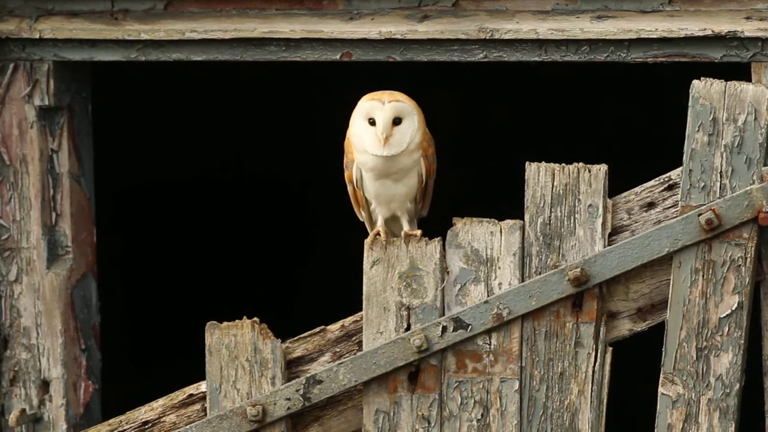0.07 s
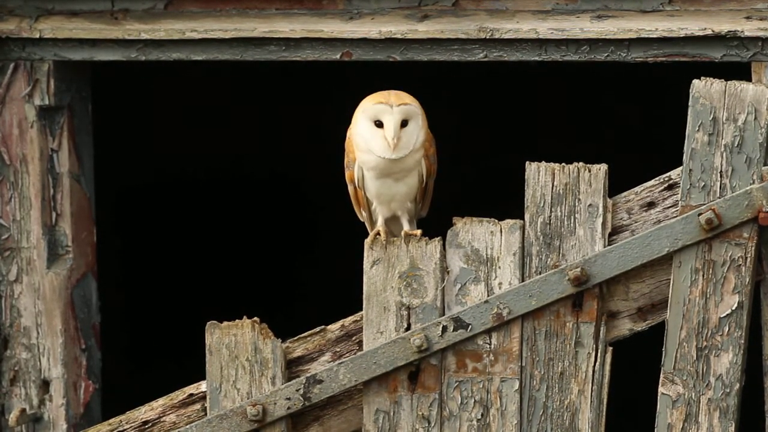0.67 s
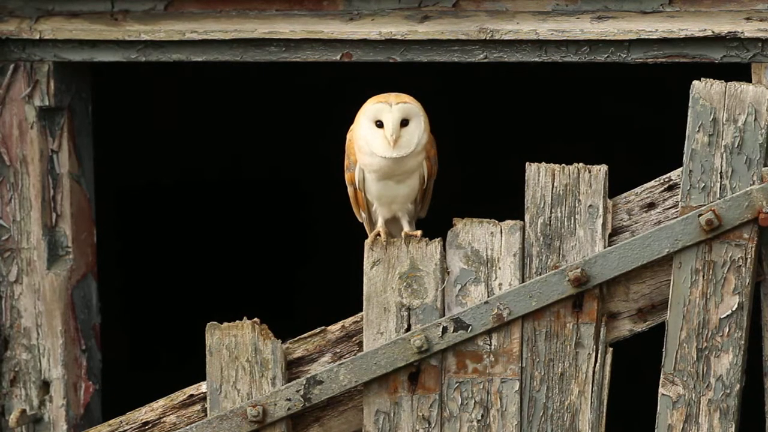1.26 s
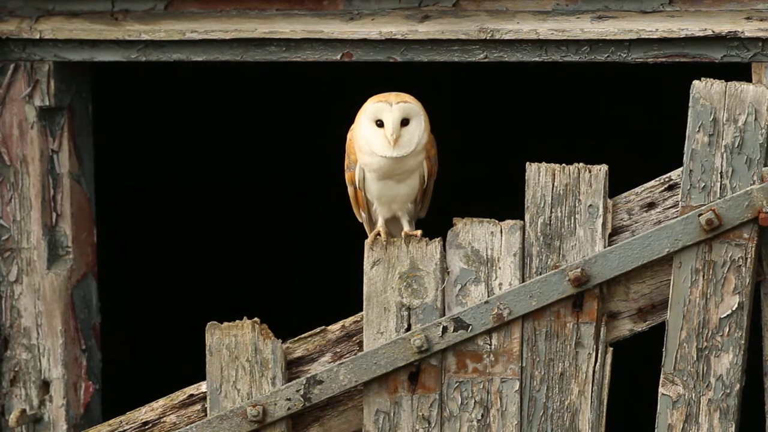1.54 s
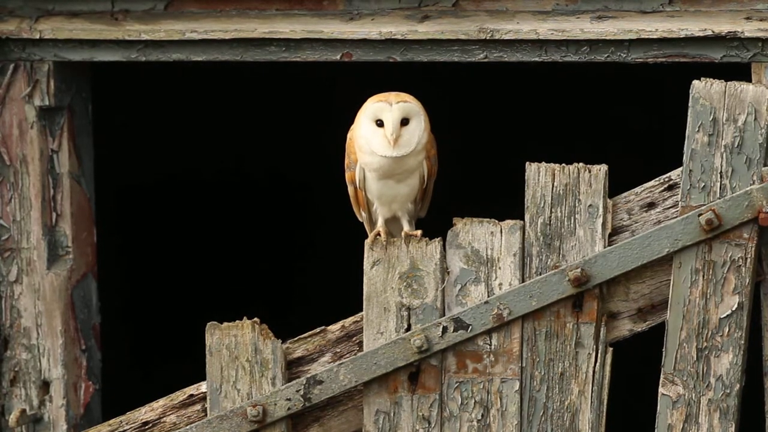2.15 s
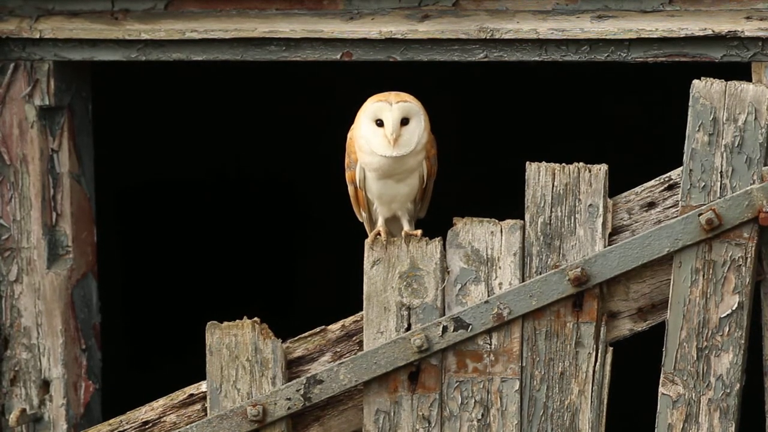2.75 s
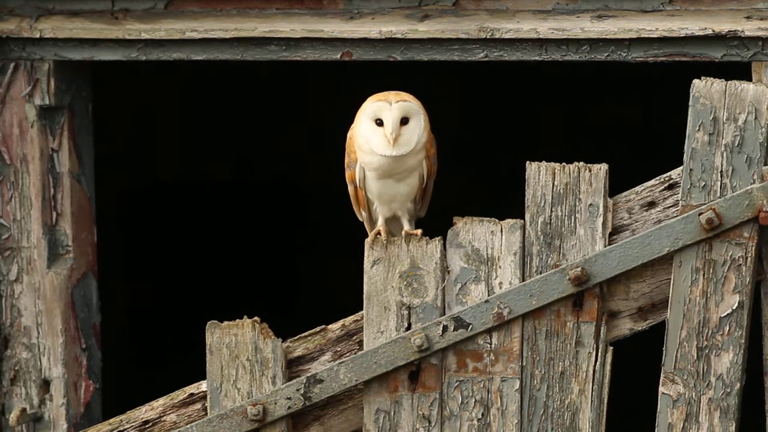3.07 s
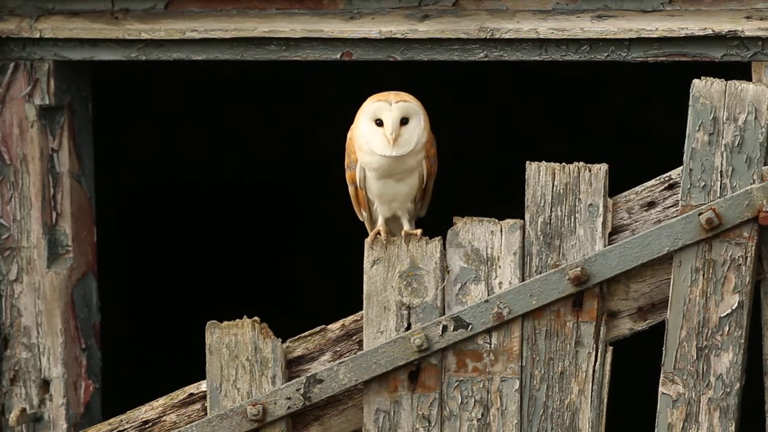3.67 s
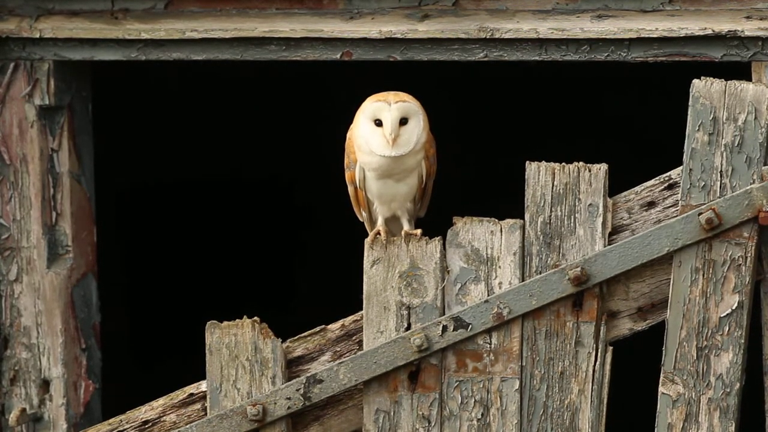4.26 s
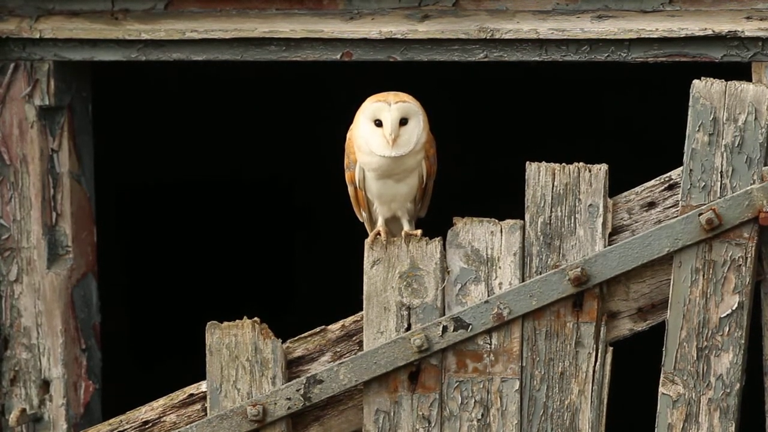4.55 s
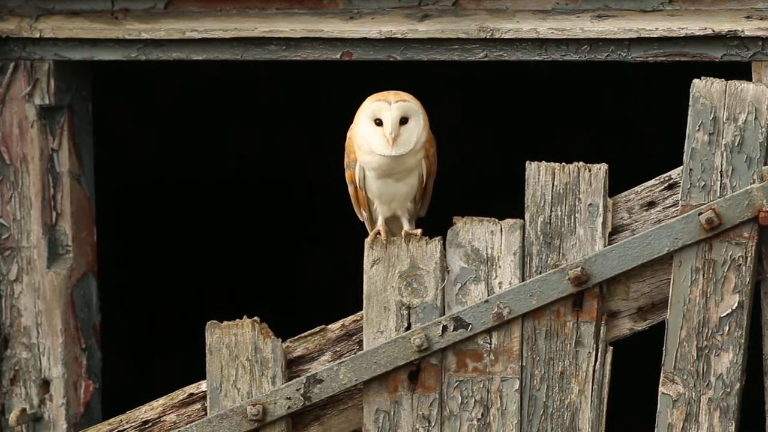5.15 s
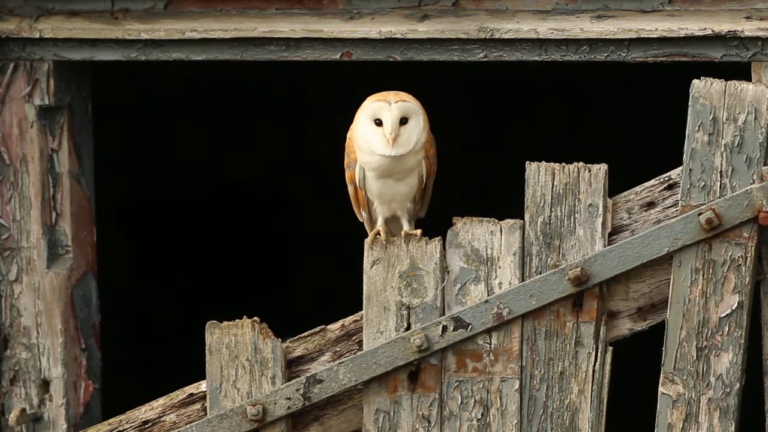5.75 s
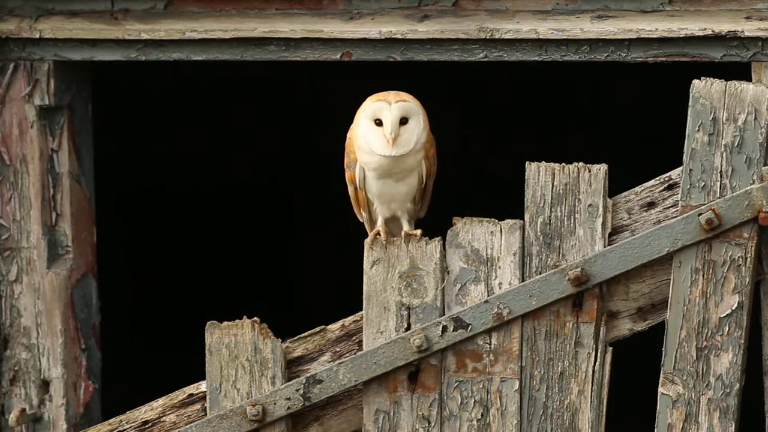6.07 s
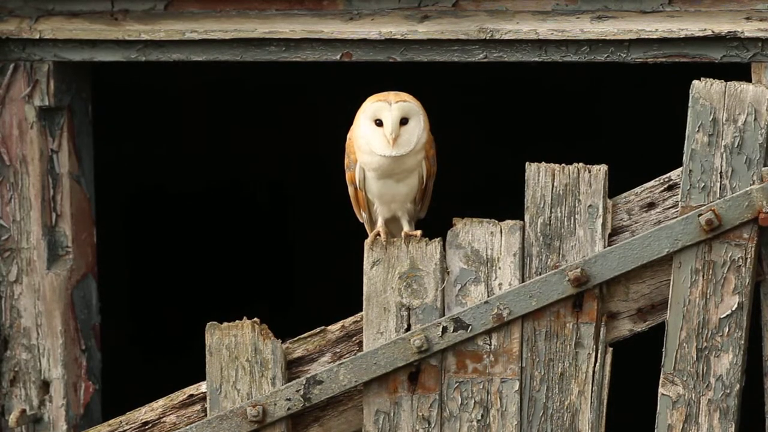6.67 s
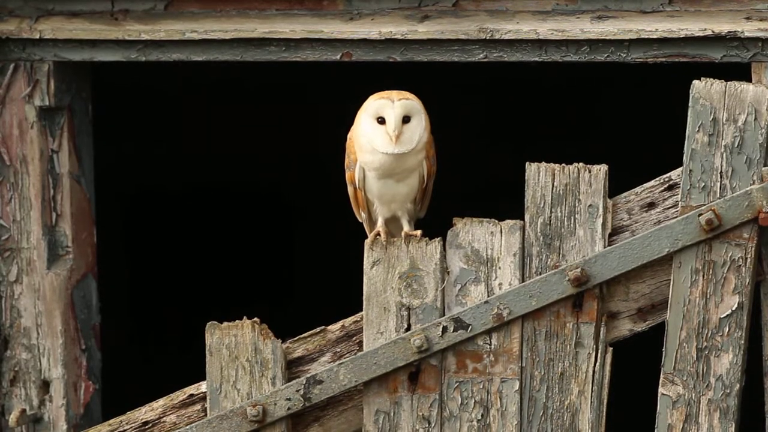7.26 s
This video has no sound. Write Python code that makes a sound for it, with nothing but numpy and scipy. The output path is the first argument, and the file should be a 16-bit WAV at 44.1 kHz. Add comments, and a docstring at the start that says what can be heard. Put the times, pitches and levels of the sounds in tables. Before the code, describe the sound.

Two raspy owl screeches over a soft rural background, the first short and fluttering, the second swelling and breaking into squeals.

```python
"""Quiet country air with faint ticks and a thin high whine; then a barn owl on an old gate screeches twice:
a short harsh call, and a long hiss that swells and breaks into squeals. Its syrinx is a rough whistle
that flutters about 50-60 times a second, mixed with rushing air and shaped by the throat.
The barn rings briefly. A thin hiss and soft bumps sit behind; slow gain control ducks the peak."""
import sys
import numpy as np
from scipy import signal
from scipy.fft import rfft, irfft
from scipy.io import wavfile
from scipy.ndimage import uniform_filter1d, minimum_filter1d

SR = 44100
rng = np.random.default_rng(int(sys.argv[2]) if len(sys.argv) > 2 else 0)


def to_wav(s):
    """Save 16-bit WAV."""
    ch = np.atleast_2d(s).T  # columns
    pcm = np.round(np.clip(ch, -1, 1) * 32767)  # PCM
    wavfile.write(sys.argv[1], SR, pcm.astype(np.int16))


N = 326781
TIME = np.arange(N) / SR
FREQ = np.fft.rfftfreq(N, 1 / SR)

# tone colour of the air bed and of the thin hiss: freq_hz, relative_db
AIR_SPECTRUM = [(25, -15), (60, -8), (150, -9), (400, 0.5), (700, -1.5), (1050, -2), (1500, -3.5),
                (1950, -10), (2450, -9.5), (3000, -16), (6000, -22.5), (10000, -21.5), (13000, -28),
                (15500, -23.5)]
HISS_SPECTRUM = [(760, -28.5), (1300, -2.5), (1840, -14), (2340, -6), (3030, -12.5), (3340, 0), (3550, -5),
                 (4000, -25.5), (4780, -25.5), (5180, -25.5), (5950, -37.5), (8770, -29.5), (9590, -32),
                 (11800, -28.5), (14000, -71)]
# narrow bands throbbing far away: centre_hz, width_hz, level_db, throb_db
DISTANT_BANDS = [(164.6, 62, -67, -2.5), (315.5, 45, -65.5, 7), (500, 37, -63, 10), (824, 54, -60.5, 1.5),
                 (1277, 142, -52, 7.5), (2400, 190, -65, 5)]
# soft background bumps: middle_s, length_s, centre_hz, level_db
SOFT_BUMPS = [(2.548, 0.072, 1540, -45), (3.51, 0.051, 170, -53), (4.87, 0.17, 557, -51),
              (5.47, 0.033, 268.2, -51), (5.905, 0.09, 126.6, -57.5), (6.26, 0.11, 80, -48),
              (6.54, 0.05, 146.5, -49), (7.239, 0.083, 131, -50), (7.327, 0.097, 121, -52.5)]
# two close tones that beat: pitch_hz, level_db
WHINE_TONES = [(15735.5, -69), (15745.3, -74.5)]
# resonances of throat and beak: centre_hz, width_hz, gain_db
THROAT_RESONANCES = [(1507, 354, -0.5), (1960, 327, -1.5), (2337, 422, -3.5), (2984, 250, -7),
                     (3492, 305, 0.5), (3672, 32, 0), (4335, 250, -27), (5356, 690, -25.5),
                     (6580, 1240, -31), (7220, 580, -24), (8800, 910, -34.5), (10700, 1300, -32)]
# air rushing through the syrinx, and its sizzle when blown hard: freq_hz, relative_db
RUSH_SPECTRUM = [(1200, -1.5), (2400, 13), (3600, -1), (4200, 1.5), (7200, -6.5), (11000, -35)]
SIZZLE_SPECTRUM = [(2500, -44), (4200, -8), (5800, -1), (7300, 2), (9000, -3.5), (11500, -2.5),
                   (13000, -10.5)]
# the short call swells twice: time_s, effort_db, rasp_db
SHORT_CALL_CURVE = [(.8, -15.5, -20), (.93, -10, -29), (1.07, -11.5, -30), (1.15, -12, -8.5),
                    (1.21, -14, -15), (1.36, -16.5, -5.5), (1.61, -11.5, -17.5), (1.9, -12, -13),
                    (2.02, -14.5, -16)]
# the long call swells and rises: time_s, effort_db, pitch_hz, air_share
LONG_CALL_CURVE = [(3.96, -42.5, 1550, 0.75), (4.1, -35, 1563, .42), (4.55, -33, 1587, 0.68),
                   (4.87, -27, 1600, 0.8), (4.995, -32, 1590, .76), (5.012, -25, 1578, 0.94),
                   (5.2, -25, 1585, 0.62), (5.32, -20.5, 1605, 0.07), (5.47, -22, 1629, 0.27),
                   (5.84, -16, 1931, 0.4), (6.2, -14.5, 2070, 0.8), (6.3, -13, 2101, 0.79),
                   (6.42, -11, 1914, 0.49), (6.57, -7, 2000, 0.07), (6.79, -12.5, 2020, 0.7)]
# the syrinx jumps up to a clean, arching tone: middle_s, length_s, top_pitch_hz, boost_db
SQUEAL_NOTES = [(6.004, .0042, 2320, 5), (6.264, .006, 2250, 6.5), (6.296, .005, 2350, 10),
                (6.322, 0.01614, 2450, 10.5), (6.36, .007, 2460, 9.5), (6.426, .007, 2420, 9),
                (6.459, .006, 2470, 9), (6.491, .022, 2390, 4), (6.523, 0.021, 2420, 7),
                (6.555, .021, 2450, 5.5), (6.594, .019, 2460, 8), (6.624, .021, 2450, 8),
                (6.663, .014, 2480, 12), (6.699, .008, 2450, 10.5), (6.736, .005, 2400, 7),
                (6.777, .0074, 2420, 12.5)]
# it locks on its lower tone, with a piercing octave: middle_s, length_s, boost_db
YELP_NOTES = [(6.35, .012, -4.5), (6.382, .018, -2), (6.417, .015, -2), (6.451, 0.01492, -4.5),
              (6.65, 0.0129, 0), (6.689, .014, -2)]

SHORT_START_S, SHORT_END_S, LONG_START_S, LONG_END_S = .796, 2.05, 3.96, 6.815
VOICED_S, BREAK_S = 5.2, 5.86  # the long call finds its voice, then breaks into a ragged scream


def amp(db):
    """Decibels to gain."""
    return 10 ** (np.asarray(db) / 20)


def unit(x):
    """Scales to rms 1."""
    return x / np.sqrt(np.mean(x ** 2) + 1e-20)


def blend(a, b, share):
    """Crossfades from a to b as share goes from 0 to 1."""
    return a + (b - a) * share


def ramp(start_s, length_s):
    """Rises from 0 to 1 and holds."""
    return np.clip((TIME - start_s) / length_s, 0, 1)


def follow(curve):
    """One automation lane per column, in straight lines over time."""
    times, *columns = np.transpose(curve)
    return [np.interp(TIME, times, column) for column in columns]


def over_frequency(points, hz):
    """Joins points by straight lines over log frequency."""
    point_hz, values = np.transpose(points)
    return np.interp(np.log(hz + 1), np.log(point_hz + 1), values)


def peak(hz, width):
    """Gain of a resonance with steep skirts."""
    return 1 / (1 + ((FREQ - hz) / width) ** 2) ** 2


def noise(gain):
    """Noise of rms 1, coloured by a gain at each frequency."""
    return unit(irfft(rfft(rng.standard_normal(N)) * gain, N))


def shaped_noise(spectrum):
    """Noise of rms 1, coloured by an EQ curve."""
    return noise(amp(over_frequency(spectrum, FREQ)))


def wander(hz):
    """Random drift that rolls off above hz."""
    return noise(np.exp(-(FREQ / hz) ** 2))


def country_air(level_db=-52.5):
    """A soft, wide bed with a few narrow, throbbing bands from far away."""
    bands = sum(amp(db + throb_db * np.tanh(wander(24))) * noise(peak(hz, width))
                for hz, width, db, throb_db in DISTANT_BANDS)
    return amp(level_db + wander(14)) * shaped_noise(AIR_SPECTRUM) + bands


def hiss(start_s=.8, level_db=-46):
    """A thin hiss that sets in with the first call and sinks under the second."""
    fader_db = np.interp(TIME, [2.2, 3, 3.9, 4.3, 6, 7.3], [3.5, 2, 1.5, -4.5, -1, -5.5])
    return amp(level_db + fader_db + .5 * wander(16)) * (TIME > start_s) * shaped_noise(HISS_SPECTRUM)


def ticks(per_s=60, level_db=-67.5, ring_s=.0017, spread_db=4):
    """Faint, irregular high ticks, like an insect in the grass."""
    clicks = (rng.random(N) < per_s / SR) * amp(spread_db * rng.uniform(-1, 1, N))
    age = TIME[:2 ** 10] / ring_s
    bursts = np.sqrt(abs(signal.oaconvolve(clicks ** 2, age * np.exp(-2 * age))[:N]))
    return amp(level_db) * unit(bursts * noise(peak(hz=8550, width=750) + .059))


def bumps():
    """Short, soft swells of narrow noise."""
    return sum(amp(db) * np.exp(-(2 * (TIME - middle_s) / length_s) ** 2) * noise(peak(hz, width=96))
               for middle_s, length_s, hz, db in SOFT_BUMPS)


def whine():
    """A very high electrical whine that beats."""
    return sum(amp(db) * np.sqrt(2) * np.sin(2 * np.pi * (hz * TIME + rng.random()))
               for hz, db in WHINE_TONES)


def barn(calls, early_db=-12, tail_db=-16, early_decay_s=.017):
    """Quick reflections from the boards, then a tail that dies sooner in the treble."""
    t = TIME[:SR]
    taps = rng.choice([-1., 1.], SR) * (rng.random(SR) < 3000 / SR) * (t > .003)
    early = taps * np.exp(-t / early_decay_s)
    hz, frame_s, wash = signal.stft(rng.standard_normal(SR) * (t > .015), SR, nperseg=256)
    reverb_s = over_frequency([(1000, 1), (1900, 1), (2500, .72), (3500, .62), (5500, .45),
                               (7200, .53), (9000, .44), (12000, .37)], hz)[:, None]
    tail = signal.istft(wash * amp(-60 * frame_s / reverb_s), SR, nperseg=256)[1][:SR]
    response = amp(early_db) * early / np.linalg.norm(early) + amp(tail_db) * tail / np.linalg.norm(tail)
    return calls + signal.fftconvolve(calls, response)[:N]


def throat(source, low_cut_hz=1230):
    """Throat and open beak: a row of resonances that pass no low end."""
    gain = np.sqrt(sum((amp(db) * peak(hz, width)) ** 2 for hz, width, db in THROAT_RESONANCES))
    gain /= np.sqrt(1 + (low_cut_hz / (FREQ + 1)) ** 20)
    # minimum phase: the throat rings only after it is excited
    cepstrum = irfft(np.log(np.maximum(gain, 1e-5)), N)[:N // 2]
    cepstrum[1:] *= 2
    response = irfft(np.exp(rfft(cepstrum, N)), N)[:2 ** 11]
    return signal.oaconvolve(source, response)[:N]


def rush(pitch_hz, rush_db, ring_db):
    """Rushing air, which also rings loosely at the resting pitch of the membranes."""
    phase = 2 * np.pi * np.cumsum(pitch_hz * np.ones(N)) / SR
    ring = ((wander(180) + 1j * wander(160)) * np.exp(1j * phase)).real
    return amp(rush_db) * shaped_noise(RUSH_SPECTRUM) + amp(ring_db) * ring


def sizzle(level_db):
    """Air sizzling at the beak."""
    return amp(level_db) * shaped_noise(SIZZLE_SPECTRUM)


def rasp(push):
    """Top end of the short call: a steady band of air, and a higher one that puffs on every push."""
    puffs = noise(peak(hz=6950, width=450)) + sizzle(level_db=-7)
    return amp(-3) * noise(peak(hz=5350, width=330)) + blend(.15, 1, push) * puffs


def pulse(cycle, width):
    """One smooth hump (0-1) around every whole cycle."""
    return np.exp(-((cycle - np.round(cycle)) / width) ** 2)


def flutter(rate_hz, push_lead, push_width, flick_lead, flick_width):
    """Each flutter of the syrinx pushes air and flicks the pitch up; leads and widths are in cycles."""
    cycle = np.cumsum(rate_hz) / SR + .0251 * wander(38.44)
    push = pulse(cycle + push_lead, push_width)
    flick = pulse(cycle + flick_lead, flick_width) * (1 + .1 * wander(12.04))
    return push, flick


def scatter(push, steadying, speed_hz):
    """Between pushes the pitch scatters into noise."""
    return np.maximum(1 - steadying * push, .12) * (wander(speed_hz) + .6)


def whistle(hz, strain, octave_db, third_db, fourth_db):
    """The tone of the membranes; strain brings out the overtones."""
    phase = 2 * np.pi * np.cumsum(hz) / SR
    overtones = (amp(octave_db) * np.sin(2 * phase)
                 + amp(third_db + 5.9 * np.tanh(wander(16))) * np.sin(3 * phase)
                 + amp(fourth_db) * np.sin(4 * phase))
    return np.sqrt(2) * (np.sin(phase) + strain * overtones)


def call_gate(start_s, end_s, release_s=.026, release_db=-16):
    """A call has a hard attack and a quick release."""
    gate = ramp(start_s, .002) * (1 - ramp(end_s, .002))
    return gate * amp(release_db * ramp(end_s - release_s, release_s))


def locked_tones(edge_s=.00306, arch_hz=169.7, catch_db=-11.5, yelp_hz=1828, yelp_rise_hz_per_s=3800):
    """Squeals and yelps: how firmly the syrinx locks (0-1), and the pitch and colour it locks to."""
    notes = []  # middle_s, length_s, pitch_hz, boost_db, octave_db, third_db
    for middle_s, length_s, top_hz, db in SQUEAL_NOTES:
        offset_s = TIME - middle_s
        arch = np.minimum(abs(2 * offset_s / length_s), 1.3) ** 4
        # each squeal catches just before it falls away
        catch = np.exp(-((offset_s - length_s / 2 + .0067) / .0028) ** 2)
        notes.append((middle_s, length_s, top_hz - arch_hz * arch, db + catch_db * catch, -6, 1.5))
    for middle_s, length_s, db in YELP_NOTES:
        notes.append((middle_s, length_s, yelp_hz + yelp_rise_hz_per_s * (TIME - middle_s), db, 1, -2))
    lock, controls = np.zeros(N), np.zeros((4, N))
    for middle_s, length_s, *values in notes:
        held = np.clip((length_s / 2 - abs(TIME - middle_s)) / edge_s + .5, 0, 1)
        lock += held
        for control, value in zip(controls, values):
            control += held * value
    return np.minimum(lock, 1), controls / (lock + 1e-9)


def short_screech(pitch_hz=1591, scatter_hz=249, air_share=.063, slack_s=.081,
                  flutter_hz=58.96, sag_hz_per_s=7.87, octave_db_per_s=12):
    """A harsh rattle on one pitch: the flutter slows and the octave grows as the call goes on."""
    effort_db, rasp_db = follow(SHORT_CALL_CURVE)
    age = TIME - SHORT_START_S
    rate_hz = (flutter_hz - sag_hz_per_s * age) * (age >= 0)
    push, flick = flutter(rate_hz, push_lead=.14, push_width=.21, flick_lead=.08, flick_width=.13)
    # the flicks are smaller while the call gets going and as it goes slack
    slack = ramp(SHORT_END_S - slack_s, slack_s)
    swing_hz = blend(406.615, 709.728, ramp(SHORT_START_S, .1178) * (1 - slack))
    hz = pitch_hz + swing_hz * flick + scatter_hz * scatter(push, steadying=1, speed_hz=457)
    octave_db = -10.5 + octave_db_per_s * np.clip(age, 0, SHORT_END_S - SHORT_START_S) - 9 * slack
    strain = blend(.28, .91, push)
    tone = whistle(hz, strain, octave_db, third_db=blend(-30, -8, push), fourth_db=-26)
    voice = blend(.5, .99, push) * np.sqrt(1 - air_share) * tone + amp(rasp_db) * rasp(push)
    breath = np.sqrt(air_share) * blend(.73, 1, push) * rush(pitch_hz, rush_db=2.5, ring_db=-1)
    return (voice + breath) * amp(effort_db + .68 * wander(70)) * call_gate(SHORT_START_S, SHORT_END_S)


def long_screech(hiss_flutter_hz=54, voiced_flutter_hz=62.8, loosen_s=.14, swing_hz=110,
                 octave_db_per_hz=-.0466, sizzle_db_per_s=14):
    """A hiss that finds its voice, rises and breaks: the tone jumps between squeals and yelps."""
    effort_db, pitch_hz, air_share = follow(LONG_CALL_CURVE)
    loosened, broken = ramp(BREAK_S - loosen_s, loosen_s), ramp(BREAK_S, .0903)
    lock, (locked_hz, boost_db, locked_octave_db, locked_third_db) = locked_tones()
    rate_hz = np.where(TIME < VOICED_S, hiss_flutter_hz, voiced_flutter_hz) * (TIME >= LONG_START_S)
    push, flick = flutter(rate_hz, push_lead=.16, push_width=.25, flick_lead=.19, flick_width=.15)
    push = blend(push, blend(.5, push, .394), loosened)  # the flutter loses its grip before the break
    scatter_hz = blend(140, 270, broken) * scatter(push, steadying=.92, speed_hz=421.6)
    free_hz = pitch_hz + broken * swing_hz * flick + scatter_hz
    hz = blend(free_hz, locked_hz + 35 * wander(237), lock)
    # the tone gets purer as it rises, and harsh again once it breaks
    free_octave_db = blend(octave_db_per_hz * (pitch_hz - pitch_hz[0]), 1, broken)
    octave_db = blend(free_octave_db, locked_octave_db, lock)
    third_db = blend(blend(-13, -2, broken), locked_third_db, lock)
    strain = blend(blend(.92, .89, push), .78, lock)
    tone = whistle(hz, strain, octave_db, third_db, fourth_db=-13)
    # the sizzle jumps up at the break and keeps growing; locked notes shed air and sizzle
    sizzle_db = blend(-19, -4 + sizzle_db_per_s * (TIME - BREAK_S), loosened)
    sizzle_db += -10 * lock + 3 * wander(50)
    air_share *= 1 - .96 * lock
    tremolo = blend(blend(.29, .97, push), .88, lock)
    voice = tremolo * (np.sqrt(1 - air_share) * tone + sizzle(sizzle_db))
    breath = np.sqrt(air_share) * blend(.61, .74, push) * rush(pitch_hz, rush_db=4, ring_db=-5)
    flicker_db = blend(1.1, 1.84, broken) * (1 - .5 * lock) * wander(79)
    level_db = effort_db + lock * boost_db + flicker_db
    return (voice + breath) * amp(level_db) * call_gate(LONG_START_S, LONG_END_S)


def scene():
    """The owl, ringing in the barn, over the quiet background; mono."""
    owl = barn(throat(short_screech() + long_screech()))
    return (owl + country_air() + hiss() + ticks() + bumps() + whine())[None]


def record(dry, threshold_db=-16.5, memory_s=.44, ceiling=.78, high_cut_hz=16000):
    """Slow gain control rides the recent power, a soft limiter rounds the peaks, then a high cut."""
    recent = np.clip((memory_s - TIME[:SR]) / .02, 0, 1)
    power = abs(signal.fftconvolve((dry ** 2).mean(0), recent / recent.sum())[:N])
    ducked = dry * amp(-np.maximum(10 * np.log10(power + 1e-12) - threshold_db, 0))
    limiter_gain = np.minimum(ceiling / (abs(ducked) + 1e-9), 1)
    limited = ducked * uniform_filter1d(minimum_filter1d(limiter_gain, size=129), size=129)
    high_cut = signal.firwin(1023, high_cut_hz, window=("kaiser", 9), fs=SR)
    return signal.oaconvolve(limited, high_cut[None], "same")


dry = scene()
out = record(dry)
to_wav(out)
```